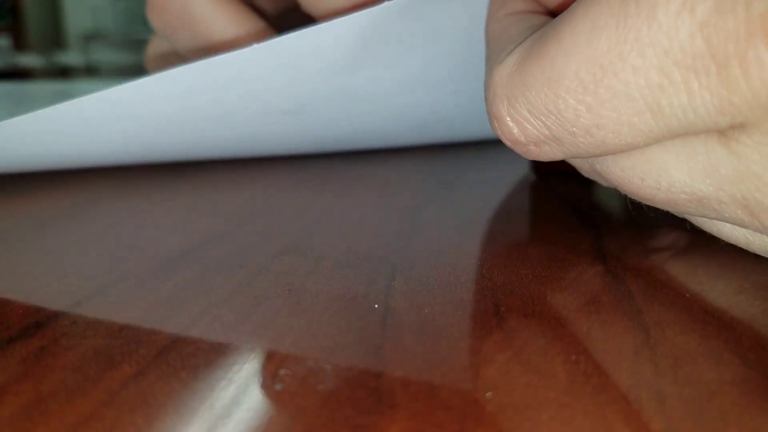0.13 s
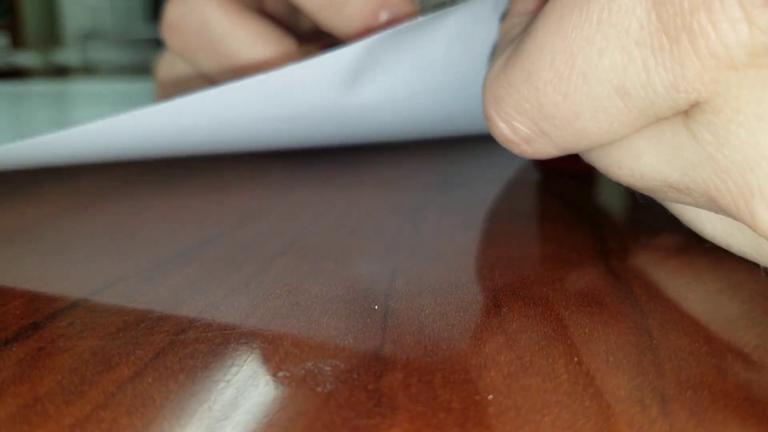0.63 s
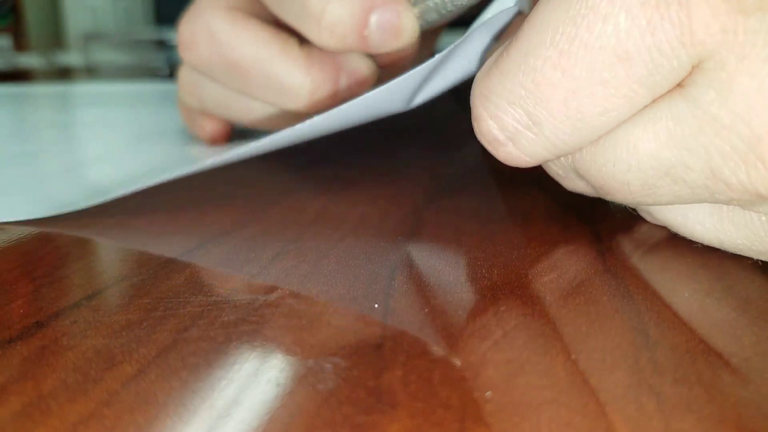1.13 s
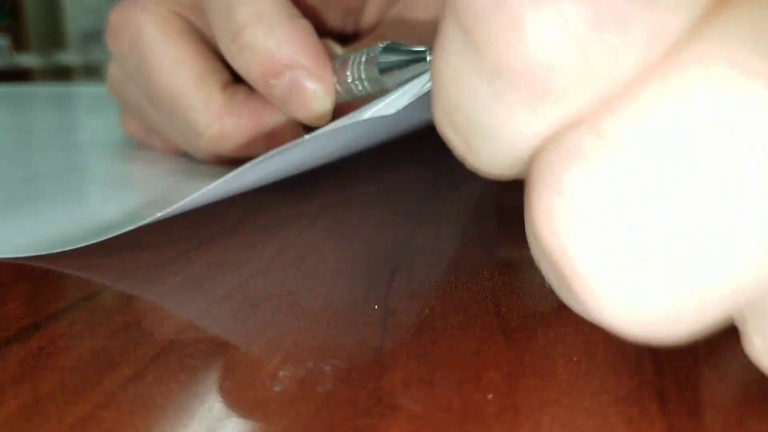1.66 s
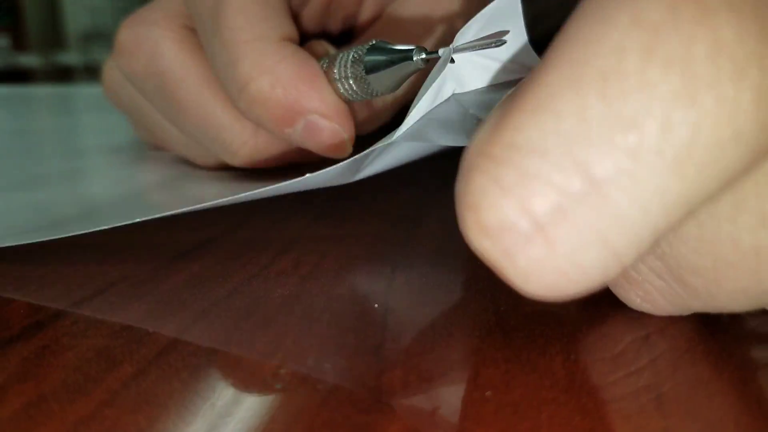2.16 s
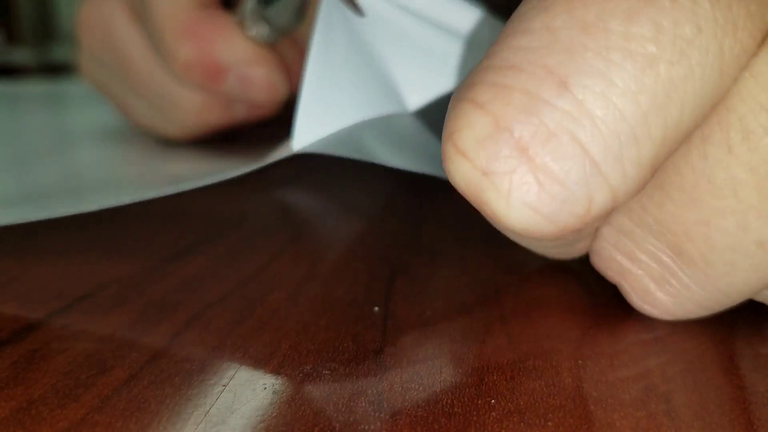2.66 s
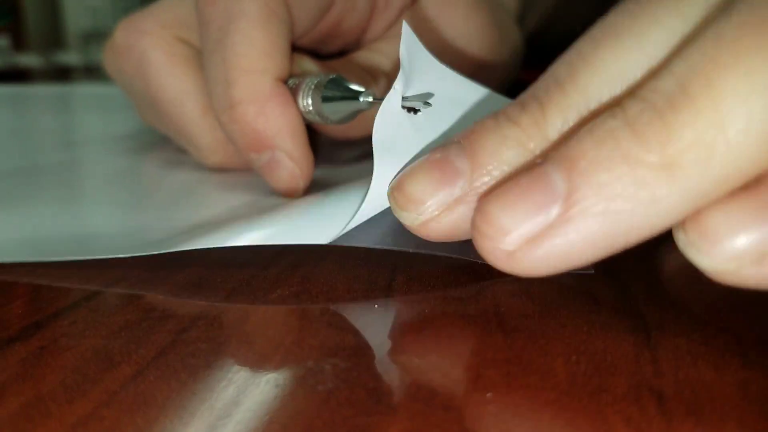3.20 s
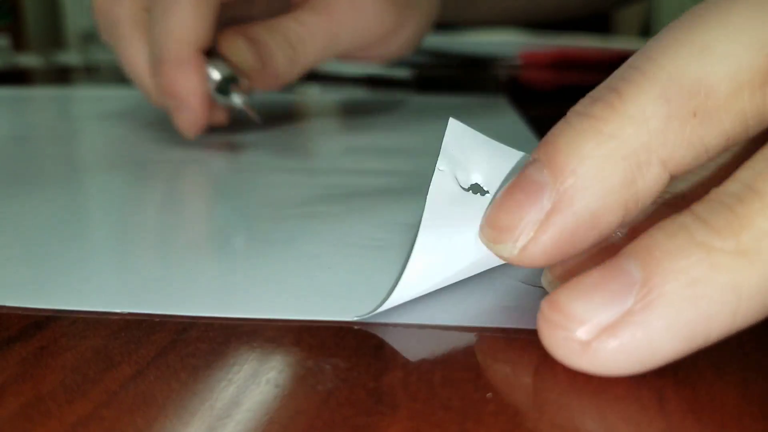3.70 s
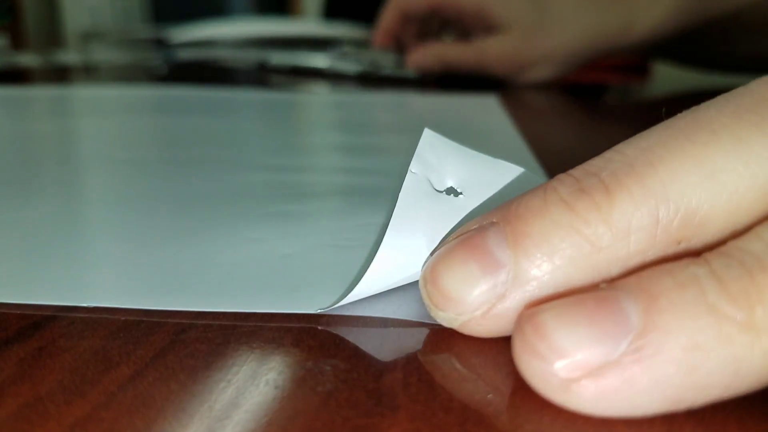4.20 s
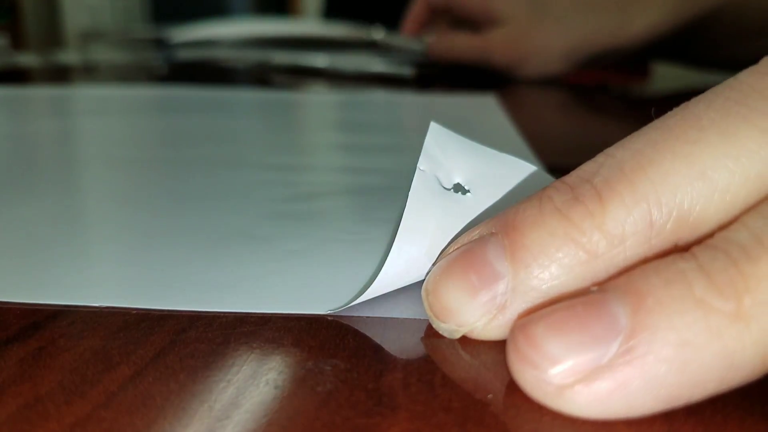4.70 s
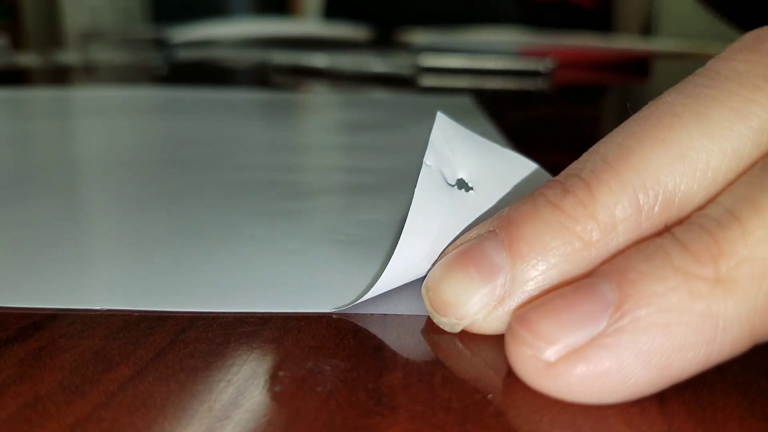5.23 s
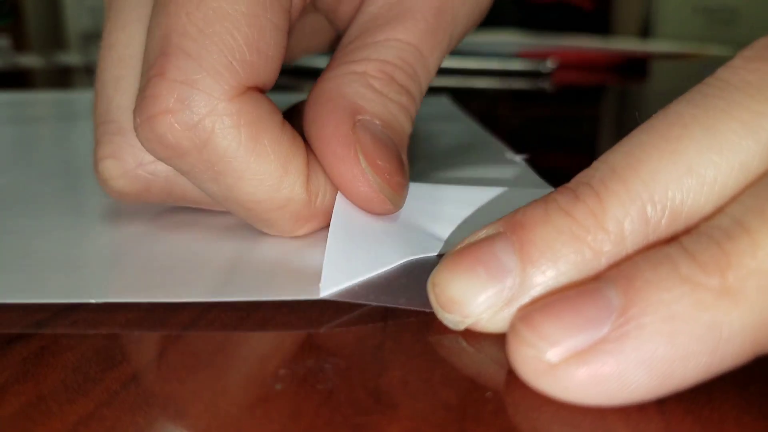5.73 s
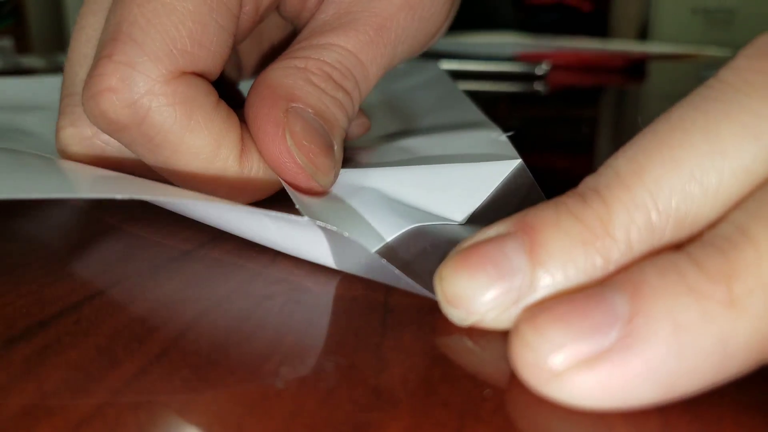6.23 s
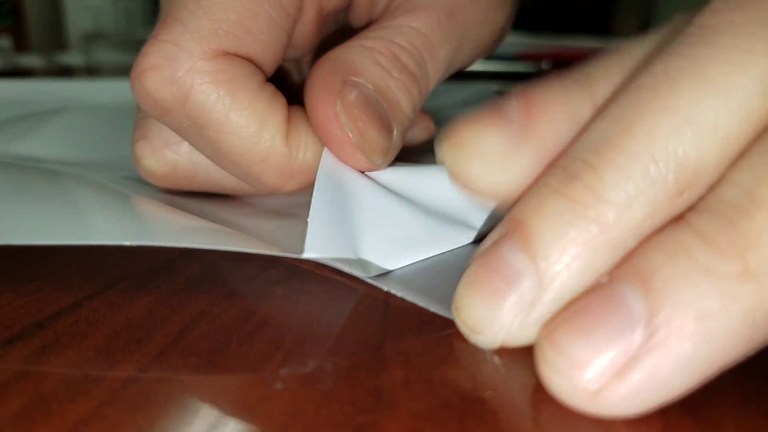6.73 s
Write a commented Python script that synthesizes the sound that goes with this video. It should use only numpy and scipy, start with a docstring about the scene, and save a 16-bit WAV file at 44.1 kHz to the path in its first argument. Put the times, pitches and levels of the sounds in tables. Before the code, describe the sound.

Very close stereo in a small quiet room: a thin plastic sheet pops and crackles in scattered short bursts as fingers and a steel hook lift its corner. A lull follows, then the metal tool is laid on the wooden table behind, knocking, rolling and bouncing ever faster with a faint steely ring. Fingertips thump down, and the film snaps and tears again.

```python
"""In a small quiet room, a thin plastic sheet lies on a wooden table, close to a pair of microphones.
It snaps and peels under fingers and a steel hook: noise bursts with short rings make the snaps and small
finger knocks, grainy noise the tears and rubs. The tool is laid down behind it: short pushes knock the table's
resonances, sines ring the steel, and it rolls and bounces. Pats, rumble, thin echoes and room tails surround it."""
import sys
import numpy as np
from scipy import signal
from scipy.fft import rfft, irfft, next_fast_len
from scipy.io import wavfile
from scipy.ndimage import map_coordinates

SR = 44100
rng = np.random.default_rng(int(sys.argv[2]) if len(sys.argv) > 2 else 0)


def wav_record(signal):
    """Record a signal, one row per channel, as 16-bit PCM in the file named by sys.argv[1]."""
    frames = np.transpose(np.atleast_2d(signal))
    bounded = np.clip(frames, -1, 1)
    # unit amplitude maps onto the largest positive 16-bit level
    quanta = np.round(bounded * 32767).astype(np.int16)
    wavfile.write(sys.argv[1], SR, quanta)


def magnitude_from_level(level_db):
    """Linear magnitude for a level in decibels (20 dB per decade)."""
    exponent = np.asarray(level_db, float) / 20
    return 10 ** exponent


N = 302967  # length in samples

# In a spectrum, "level per Hz" gives only the shape; the overall loudness is set where it is used.
# Snaps of the sheet and small finger knocks: (time [s], body level [dB], crack over body [dB], ring [Hz],
# left over right before a fixed shift [dB])
SNAPS = [(0.0355, -33.5, -15.5, 1420, 9), (0.3, -40.5, -21, 1050, 1), (0.4983, -36.5, -28, 1450, 3),
         (0.509, -39.5, -23, 990, 18), (0.7309, -23.5, -5, 1350, 9.5), (0.852, -38, -15, 1070, 5),
         (0.9098, -22, -7.5, 2150, 9), (1.4486, -27, -6, 1310, 0), (1.4924, -24.5, -4, 1010, 7),
         (1.71, -34, -15, 573, 3), (1.790, -35.5, -70, 1440, 1.5), (1.926, -45.5, -55, 1740, 6.5),
         (1.956, -27, -10, 1550, 3.5), (1.975, -43, -20, 1700, 10), (1.986, -33, -11, 1490, 4),
         (1.9912, -39.5, -4, 1600, 0), (2.0015, -43, -20, 1610, -1.5), (2.0225, -37, -17, 1400, 5.5),
         (2.0599, -35, 4, 1330, -10), (2.077, -25, 15.5, 1320, 1.5), (2.0923, -35, 11, 1380, 5),
         (2.3496, -36.5, -8, 1180, 7), (2.7215, -44, -26, 620, 4), (2.7474, -24.5, -26, 1117, 4),
         (2.7898, -32, 1.5, 1200, 2.5), (2.8972, -38.5, -19, 830, 1), (3.0482, -56, -20, 1920, -10),
         (3.061, -19.5, 2, 2520, 1.5), (3.0642, -27.5, 2, 2000, -20), (3.2465, -34, 3, 2750, -10),
         (3.5871, -40, -9.5, 860, 2.5), (4.102, -58, 23.5, 980, 0), (5.3745, -31, -6, 2840, -4),
         (5.3781, -33, -9, 2800, -2.5), (5.4345, -41.5, -2, 1484, 7), (5.978, -25.5, -7.5, 2800, -5.5),
         (6.134, -42.5, -45.5, 694, 4), (6.202, -36, -33.5, 588, 15), (6.328, -43.5, -30, 597, 7),
         (6.473, -20.5, -1.5, 480, -2.5), (6.5416, -15, -9.5, 4400, 14.5), (6.5432, -18.5, 0.5, 3000, 22),
         (6.5771, -28, -17, 1780, -3), (6.654, -21.5, -11.5, 1040, 0), (6.8081, -25.5, -5.5, 2140, -6),
         (6.8461, -31.5, -16, 586, 9.5)]
# Dry crack of a snap: (frequency [Hz], level per Hz [dB])
CRACK_SPECTRUM = [(1500, -1.5), (4300, -2), (6200, -4), (8000, -1.5), (13000, -5), (16500, -4)]
# Puff of a middling panel of the sheet: (frequency [Hz], level per Hz [dB])
PANEL_SPECTRUM = [(350, -28), (800, 6.5), (1900, 11.5), (3000, 9.5), (4600, -7.5), (6500, -42.5)]
# Air pushed by the whole sheet: (frequency [Hz], level per Hz [dB])
FLAP_SPECTRUM = [(40, -19.5), (130, -2), (250, 2.5), (500, -1.5), (900, -37)]
# Glue lets go in a short bright tear: (time [s], length [s], level [dB], left over right [dB])
TEARS = [(1.469, 0.044, -50.5, -1.5), (2.765, 0.035, -50.5, 9), (5.432, 0.023, -52, 10.5),
         (5.498, 0.048, -61, 9), (6.505, 0.025, -44.5, 0), (6.535, 0.0082, -37, -6.5),
         (6.568, 0.037, -54.5, -8.5)]
# Bright fizz of plastic: (frequency [Hz], level per Hz [dB])
FIZZ_SPECTRUM = [(2500, -5.5), (4500, 1.5), (7000, -1), (10000, -3.5), (13000, 2), (16000, 1)]
# Fingertips land on sheet and table: (time [s], push level [dB], pitch [Hz])
PATS = [(0.034, -36, 154), (0.729, -34, 340), (1.708, -37, 234), (1.9533, -33.5, 264), (1.973, -42, 276),
        (1.9821, -37, 280), (1.99, -37, 268), (1.999, -41, 290), (2.79, -33.5, 382), (5.376, -20.5, 301),
        (5.975, -36.5, 137), (6.164, -37.5, 211.3), (6.211, -32.5, 480), (6.471, -32.5, 344),
        (6.845, -39, 326)]
# Fingers, sheet and tool drag over each other: (time [s], length [s], level [dB], middle resonance [Hz])
RUBS = [(0, 0.12, -61, 2460), (0.21, 0.38, -67, 1240), (1.102, 0.33, -64, 630), (1.428, 0.4, -63, 2020),
        (1.665, 0.13, -74, 2040), (2.152, 0.24, -66.5, 1440), (2.354, 0.26, -61, 1330),
        (2.162, 0.45, -65, 607), (3.984, 0.087, -66.5, 505), (4.24, 0.58, -50.5, 617),
        (4.765, 0.89, -58.5, 640), (5.252, 0.078, -61, 700), (5.446, 0.39, -65.5, 670),
        (5.917, 0.41, -67.5, 1430), (6.059, 0.29, -55.5, 680), (6.57, 0.6, -60, 2200)]
# Thin plastic fizzes, dull drags hardly: (resonance [Hz], fizz over rub [dB])
RUB_FIZZ = [(600, -33.5), (900, -10.5), (1450, 4), (2200, -4.5)]
# Drags sing in a narrow band: (resonance [Hz], width over middle frequency [ratio])
RUB_WIDTH = [(700, .42), (1400, .25), (2200, .7)]
# The tool meets the table: (time [s], strength of push [dB], contact [ms])
KNOCKS = [(1.5769, -17, 0.7), (4.125, -27.5, 0.78), (4.1318, -25, 0.62), (4.1461, -16.5, 0.72),
          (4.1687, -8, 0.51), (4.1972, -14.5, 0.28), (4.1996, -9, 0.41), (4.2084, -11.5, 0.67),
          (4.2205, -19, 0.77), (4.717, -11.5, 0.52), (4.81, -26, 0.69), (4.883, -12.5, 0.7),
          (4.9039, -13.5, 1), (5.0179, -10, 0.39), (5.0728, -20, 0.21), (5.625, -27, 0.81),
          (4.99, -17.5, 1), (4.2052, -11, 0.69), (4.2165, -7, 0.89), (4.248, -13, 0.95), (4.283, -21, 0.76)]
# Let go, the two ends of the tool bounce in turn, ever faster: (time [s], strength of push [dB], contact [ms])
BOUNCES = [(5.014, 0.5, 0.39), (5.037, -15, 0.6), (5.0586, -1.5, 0.38), (5.082, -10, 0.3),
           (5.097, -5, 0.36), (5.1165, -7.5, 0.49), (5.1305, -8.5, 0.33), (5.1437, -10, 0.36),
           (5.1532, -10, 0.79), (5.1613, -13.5, 0.59), (5.167, -15.5, 0.36), (5.179, -17.5, 0.49),
           (5.1842, -26.5, 0.73)]
# Resonances of the table top: (frequency [Hz], width [Hz], relative level [dB])
TABLE_MODES = [(200, 45, -4), (318, 55, -1), (457, 40, 1), (610, 45, 7.5), (760, 300, -2), (1050, 90, 4),
               (1310, 90, 6), (1740, 60, -1), (2060, 120, -2), (2300, 200, -4)]
# Free ringing of the steel bar: (frequency [Hz], relative level [dB], time to fall 60 dB [s])
STEEL_MODES = [(3320, -12, 0.2), (3378, -8, 0.14), (4770, -19, 0.06), (8365, -6, 0.18), (8551, -9, 0.2),
               (9480, -31, 0.045), (14800, -27, .08)]
# Which side the steel rings on: (frequency [Hz], left over right [dB])
STEEL_LEFT = [(3000, -4.5), (6000, 34), (8400, 17), (15000, 9)]
# Tick of steel on varnish: (frequency [Hz], level per Hz [dB])
TICK_SPECTRUM = [(1500, -24), (3000, -28.5), (5000, -3), (9000, -17), (16000, -23.5)]
# Slow swings of the whole table top: (frequency [Hz], relative level [dB], time to fall 60 dB [s])
BOOM_MODES = [(85, -11, .7), (123, -2, .7), (205, -1, .32)]
# Weight shifting on the table: (time [s], middle level [dB])
MOTION = [(0.0, -68), (0.82, -62.5), (1.13, -65), (1.872, -60.5), (2.47, -66.5), (3.88, -83.5),
          (4.23, -62.5), (4.76, -84.5), (5.11, -44.5), (5.36, -53), (5.74, -64), (6.87, -59.5)]
# Low rumble of the hands: (frequency [Hz], level per Hz [dB])
HANDS_SPECTRUM = [(20, 2.5), (50, -2), (120, 3.5), (250, -5.5), (500, -48)]
# Two facing surfaces: (delay [s], level [dB])
ECHOES = [(.0094, -28.5), (0.0215, -25)]
# How long the room rings: (frequency [Hz], time to fall 60 dB [s])
ROOM_T60 = [(150, 0.14), (500, 0.33), (1400, 0.22), (4000, 0.23), (10000, 0.16)]
# Steady background noise: (frequency [Hz], level per Hz [dB])
BACKGROUND_SPECTRUM = [(25, -19), (296, -0.5), (1060, -5.5), (1280, -4.5), (1550, -7.5), (1980, -8),
                       (2210, -6), (6210, -19.5), (6730, -21), (14800, -17), (16500, -25)]
# How alike left and right are: (frequency [Hz], likeness from 0 to 1 [ratio])
BACKGROUND_ALIKE = [(60, 0.043), (290, 0.92), (640, 0.28), (1400, 0.014)]

LEFT_LEAD_S = 0.0002  # the left microphone hears the sheet this much earlier; the table top's answer reaches it only 0.08 ms before the right
FIRM_PAT_DB, PAT_GROWS = -23, 0.44  # lighter pats stir table and rumble less: extra dB per dB below a firm one


def unit(x):
    """Scales a sound to an average strength (rms) of 1."""
    return x / np.sqrt(np.mean(x ** 2) + 1e-20)


def along(points, hz):
    """Reads a value between (frequency, value) points, on a log frequency axis."""
    f, v = np.transpose(points)
    return np.interp(np.log(hz + 1), np.log(f + 1), v)


def wobble(rate):
    """A smooth random curve through `rate` random points a second."""
    knots = rng.standard_normal(int(N * rate / SR) + 4)
    return map_coordinates(knots, [np.arange(N) * rate / SR])


def filtered(x, response):
    """Shapes a sound by a gain, possibly complex, for each frequency."""
    n = x.shape[-1]
    m = next_fast_len(n + 8192)
    return irfft(rfft(x, m) * response(np.fft.rfftfreq(m, 1 / SR)), m)[..., :n]


def sides(pan_db):
    """Left and right gains as a column; positive leans left."""
    return magnitude_from_level([[pan_db / 2], [-pan_db / 2]])


def add(out, s, sound):
    """Mixes a sound in at time s."""
    i = max(round(s * SR), 0)
    out[i:i + len(sound)] += sound[:len(out) - i]


def rush(spectrum, alike, grit_db):
    """Stereo noise of rms 1 whose tiny grains vary in strength."""
    pair = rng.standard_normal((2, N)) * magnitude_from_level(grit_db * wobble(rate=670))

    def mid_side_gains(hz):
        # More middle than side makes left and right more alike.
        angle = np.arccos(np.clip(along(alike, hz), -1, 1)) / 2
        return magnitude_from_level(along(spectrum, hz)) * [np.cos(angle), np.sin(angle)]

    mid, side = filtered(pair, mid_side_gains)
    return unit(np.array([mid + side, mid - side]))


def burst(spectrum, attack, t60, spike=0.98):
    """A puff of coloured noise with peak 1; a short spike time [s] sharpens its front."""
    t = np.arange(round(1.5 * t60 * SR)) / SR
    noise = filtered(rng.standard_normal(SR // 4), lambda hz: magnitude_from_level(along(spectrum, hz)))[:len(t)]
    x = noise * (1 - np.exp(-t / attack)) * magnitude_from_level(-60 * t / t60) / (1 + t / spike)
    return x / np.abs(x).max()


def stroke(s, length, edge):
    """A pull that rises and falls once; a small edge makes it flatter on top."""
    return np.sin(np.pi * np.clip((np.arange(N) / SR - s) / length, 0, 1)) ** edge


def snaps():
    """Sheet snaps and small finger knocks: a dry crack, a few cycles of ring and a low flap, left side first."""
    tilt, even_db = 0.23, 18  # a duller pop loses its top: dB per octave per dB below this sharpness
    ring_cycles, ring_level_db, ring_per_dull = 15, -12, 0.43  # cycles to fall 60 dB; a dull pop rings more
    panel_hz, panel_follows = 2000, 0.14  # a higher ring comes with a brighter puff
    lean_db, lean_follows = -6.5, 0.96  # the body leans right of the listed side, which it follows
    flap_db, flap_grows = -30, 0.56  # flap of a 0 dB body; dB of flap per dB of body
    out, t = np.zeros((2, N)), np.arange(SR // 20) / SR
    for s, body_db, sharp_db, ring_hz, pan_db in SNAPS:
        dullness = min(sharp_db - even_db, 0)
        colour = [(hz, db + tilt * dullness * max(np.log2(hz / 8000), 0)) for hz, db in CRACK_SPECTRUM]
        crack = burst(colour, attack=0.0001, t60=0.019, spike=0.000087)
        crack = magnitude_from_level(body_db + sharp_db) * crack * sides(pan_db + 13.5)

        ring = np.sin(2 * np.pi * ring_hz * t) * magnitude_from_level(-60 * t * ring_hz / ring_cycles)
        ring *= 1 - np.exp(-t / 0.00067)
        brighter = (ring_hz / panel_hz) ** panel_follows
        colour = [(hz * brighter, db) for hz, db in PANEL_SPECTRUM]
        puff = burst(colour, attack=0.00009, t60=0.025, spike=0.0014)
        body = np.pad(puff, (0, len(t)))[:len(t)] + magnitude_from_level(ring_level_db - ring_per_dull * sharp_db) * ring
        body = magnitude_from_level(body_db) * body * sides(lean_db + lean_follows * pan_db)

        flap = magnitude_from_level(flap_db + flap_grows * body_db) * burst(FLAP_SPECTRUM, attack=0.00061, t60=0.093)
        for side in 0, 1:
            heard = s + side * LEFT_LEAD_S
            add(out[side], heard - 0.0003, crack[side])
            add(out[side], heard - 0.0009, body[side])
            add(out[side], heard - 0.0009, flap)
    return out


def tears():
    """Glue letting go: dense bright grains under a rising and falling pull."""
    pull = np.zeros((2, N))
    for s, length, db, pan_db in TEARS:
        pull += magnitude_from_level(db) * sides(pan_db) * stroke(s, length, edge=1.0)
    return pull * rush(FIZZ_SPECTRUM, [(5000, 0.2)], grit_db=2.5)


def pats():
    """A soft fingertip: one low push that dies fast, and a short rumble that shifts with its pitch."""
    delay_s, push_cycles = 0.0015, 5.5  # the push starts this long after the listed time; cycles to fall 60 dB
    rumble_db, flap_hz = -5, 260  # rumble under a firm push; centre of the flap spectrum
    out, t = np.zeros(N), np.arange(SR // 10) / SR
    for s, db, hz in PATS:
        push = -magnitude_from_level(db - 60 * t * hz / push_cycles) * np.sin(2 * np.pi * hz * t)
        add(out, s + delay_s, push)
        colour = [(f * hz / flap_hz, level) for f, level in FLAP_SPECTRUM]
        rumble = burst(colour, attack=0.0039, t60=0.095)
        add(out, s + delay_s, magnitude_from_level(db + rumble_db + PAT_GROWS * (db - FIRM_PAT_DB)) * rumble)
    return out


def rubs():
    """Gritty friction through one wandering resonance for each stroke, with a fine fizz on top."""
    wanders = 1.09  # the band drifts up and down by this ratio
    grit = rush([(1000, 0)], [(500, 0.28), (1500, 0.099)], grit_db=2)
    out, fizz = np.zeros((2, N)), np.zeros(N)
    drift = np.pi / 4 * (1 + np.tanh(2 * wobble(rate=8)))  # fades between the low and the high band
    for s, length, db, centre_hz in RUBS:
        i = slice(round(s * SR), round((s + length) * SR))
        pull = stroke(s, length, edge=0.39)
        width = along(RUB_WIDTH, centre_hz) * centre_hz

        def band(c):
            def response(f):
                hump = 1j * f * width / (c ** 2 - f * f + 1j * f * width)
                return hump * (hump + 0.9) / (1 + f / 4000)
            return unit(filtered(grit[:, i], response))

        low, high = band(centre_hz / wanders), band(centre_hz * wanders)
        out[:, i] += magnitude_from_level(db) * pull[i] * (np.cos(drift[i]) * low + np.sin(drift[i]) * high)
        fizz += magnitude_from_level(db + along(RUB_FIZZ, centre_hz)) * pull
    smooth = magnitude_from_level(1.1 * wobble(rate=12)) * rush(FIZZ_SPECTRUM, [(8000, 0.05)], grit_db=0.7)
    return out * magnitude_from_level(2.5 * wobble(rate=20)) + fizz * smooth


def wood(f, gains):
    """The table top's resonances, with alternating signs, mixed at the given strengths."""
    modes = [(-1) ** k * magnitude_from_level(db) * 1j * f * width / (c * c - f * f + 1j * f * width)
             for k, (c, width, db) in enumerate(TABLE_MODES)]
    return gains @ np.array(modes)


def tool():
    """Each contact is a short push with an after-chatter; it knocks the top and rings the steel bar anew."""
    release_s, grip_db, grip_shortens = 5, -6, 0.5  # until let go, the hand damps the steel
    ring_over_db, ring_dulls = 11, 96.5  # ring over push; dB lost per ms of contact
    mix_spread_db = 3  # how much the mode strengths vary between the random mixes
    blows, ticks = np.zeros((4, N)), np.zeros(N)  # four random mixes of the modes, used in turn
    steel, t = np.zeros((2, N)), np.arange(SR // 2) / SR
    hz, level_db, t60 = np.transpose(STEEL_MODES)[:, :, None]
    left_db = along(STEEL_LEFT, hz)
    for k, (s, knock_db, contact_ms) in enumerate(KNOCKS + BOUNCES):
        held = s < release_s
        ring_db = knock_db + ring_over_db - ring_dulls * contact_ms + grip_db * held
        life = t60 * (grip_shortens if held else 1)
        luck = rng.standard_normal((2, len(STEEL_MODES), 1))
        modes = magnitude_from_level(ring_db + level_db + 2 * luck[0] - 60 * t / life)
        modes = modes * np.sin(2 * np.pi * hz * t + 3 * luck[1])
        modes *= 1 - np.exp(-t / 0.006)  # the ring swells
        add(steel[0], s, np.sum(modes * magnitude_from_level(left_db / 2), axis=0))
        add(steel[1], s, np.sum(modes * magnitude_from_level(-left_db / 2), axis=0))

        blow = blows[k % len(blows)]
        push = np.sin(np.pi * np.clip(1000 * t[:64] / contact_ms, 0, 1)) ** 2  # longer contact, duller sound
        push = -magnitude_from_level(knock_db) * push / push.sum()
        add(blow, s - 0.0005, push)
        tick = burst(TICK_SPECTRUM, attack=0.0001, t60=0.014)
        add(ticks, s - 0.0002, magnitude_from_level(knock_db - 4.0 - 53.0 * contact_ms) * tick)
        for wait, size in rng.random((7, 2)):  # after-chatter
            add(blow, s + 0.002888 + 0.032 * wait, magnitude_from_level(-7.5 - 14 * wait) * (2 * size - 1) * push)

    # A different mix for each row of blows and each side, so knocks differ in colour.
    gains = magnitude_from_level(21.0 + mix_spread_db * rng.standard_normal((len(blows), 2, len(TABLE_MODES))))
    delays_s = np.array([[0.001], [0.00088 + LEFT_LEAD_S]])  # the top answers after the click

    def response(f):
        hump = f * f * 1400 / 1900 / (1900 ** 2 - f * f + 1j * f * 1400)
        click = magnitude_from_level(25.0) * hump / (1 + 1j * f / 3000)
        return click + wood(f, gains) * np.exp(-2j * np.pi * f * delays_s)

    return filtered(blows[:, None], response).sum(axis=0) + ticks + steel


def boom():
    """Fingertips and the bouncing tool set the bare top swinging, a little differently under each microphone."""
    pat_swing_db, bounce_swing_db = -18.5, -38.5  # swing over a firm pat, and over a bounce
    out, t = np.zeros((2, N)), np.arange(SR) / SR
    hz, level_db, t60 = np.transpose(BOOM_MODES)[:, :, None]
    blows = [(s, db + pat_swing_db + PAT_GROWS * (db - FIRM_PAT_DB)) for s, db, _ in PATS]
    blows += [(s, db + bounce_swing_db) for s, db, _ in BOUNCES]
    for s, db in blows:
        for channel, luck in zip(out, rng.standard_normal((2, len(BOOM_MODES), 1))):
            swing = magnitude_from_level(db + level_db + 2 * luck - 60 * t / t60) * np.sin(2 * np.pi * hz * t)
            add(channel, s, np.sum(swing, axis=0))
    return out * magnitude_from_level(3.5 * wobble(rate=25))  # the swing wavers in strength


def motion():
    """Weight shifting on the table: a low, restless rumble."""
    level_db = np.interp(np.arange(N) / SR, *np.transpose(MOTION))
    return magnitude_from_level(level_db + 1.1 * wobble(rate=71)) * rush(HANDS_SPECTRUM, [(100, 0.19)], grit_db=-4.0)


def echoes(sheet):
    """Two facing surfaces send back faint delayed copies of the sheet."""
    return sum(magnitude_from_level(db) * np.pad(sheet, ((0, 0), (round(s * SR), 0)))[:, :N] for s, db in ECHOES)


def room(x):
    """Each frequency of the tail dies at its own speed; every quarter second of sound stirs a new tail."""
    n, wait = round(0.25 * SR), 250  # samples in a piece, samples before the tail
    out = np.zeros((2, N + SR))
    for i in range(0, N, n):
        hz, t, z = signal.stft(rng.standard_normal((2, SR // 2)), SR, nperseg=256)
        alike = np.clip(along(BACKGROUND_ALIKE, hz), 0, 1)[:, None]
        z[1] = alike * z[0] + np.sqrt(1 - alike ** 2) * z[1]
        decay = magnitude_from_level(-60 * t / along(ROOM_T60, hz)[:, None])
        tail = signal.istft(z * decay, SR, nperseg=256)[1]
        tail *= 1 - np.exp(-np.arange(tail.shape[1]) / SR / 0.00085)  # the walls answer gradually
        wet = signal.fftconvolve(x[:, i:i + n], tail / np.linalg.norm(tail[0]), axes=1)
        out[:, i + wait:i + wait + wet.shape[1]] += wet
    return out[:, :N]


def background():
    """A faint steady stereo noise."""
    return magnitude_from_level(-65) * rush(BACKGROUND_SPECTRUM, BACKGROUND_ALIKE, grit_db=1.2)


def scene():
    """The near sheet is dry with thin echoes, the farther tool is wetter."""
    sheet = snaps() + tears() + pats()
    far = tool()
    near = sheet + echoes(sheet) + rubs()
    table = far + boom() + motion()
    return near + table + room(magnitude_from_level(-14.5) * sheet + magnitude_from_level(-4.0) * far) + background()


def band_limit(x):
    """A steep low-pass at the top of the band."""
    return signal.sosfilt(signal.butter(12, 17170, fs=SR, output="sos"), x)


def record(dry):
    """Cuts the deep bass and everything from a top frequency up."""
    top_hz, low_cut_hz = 16700, 28
    mix = filtered(dry, lambda hz: (hz < top_hz) * hz ** 2 / (hz ** 2 + low_cut_hz ** 2))
    return band_limit(mix)


dry = scene()
out = record(dry)
wav_record(out)
```